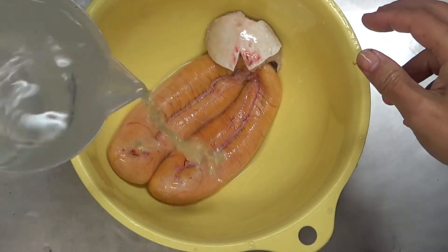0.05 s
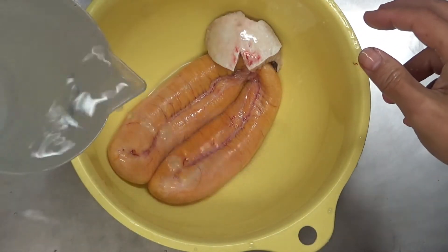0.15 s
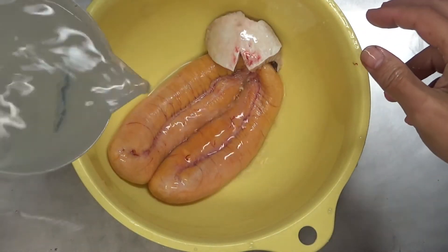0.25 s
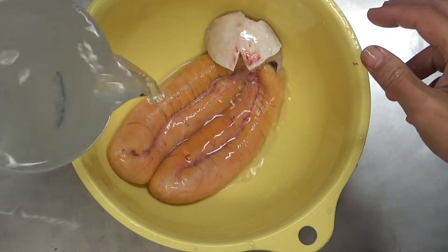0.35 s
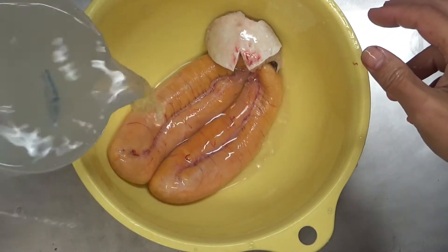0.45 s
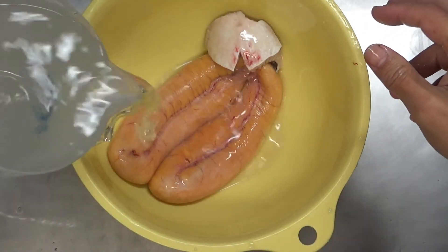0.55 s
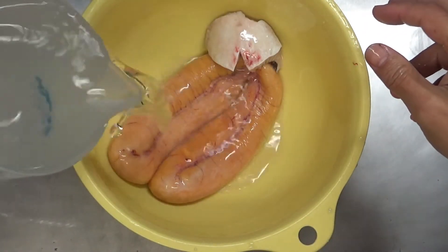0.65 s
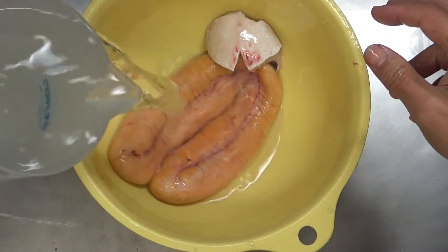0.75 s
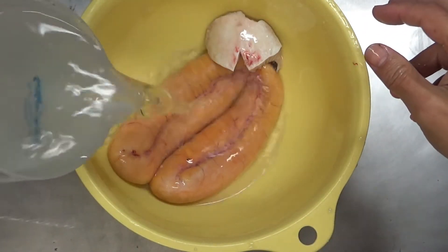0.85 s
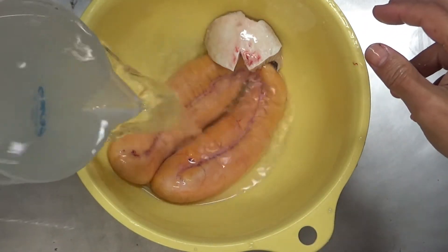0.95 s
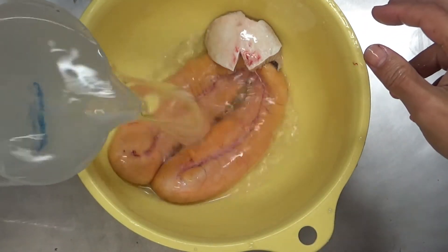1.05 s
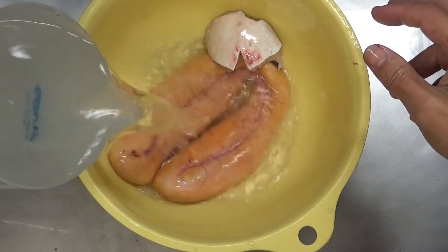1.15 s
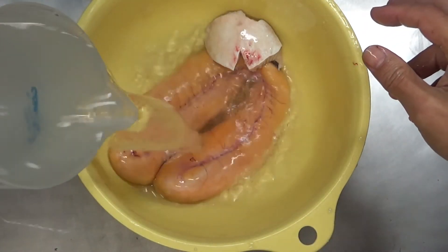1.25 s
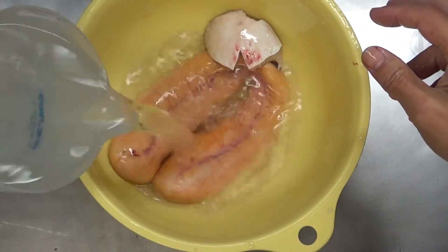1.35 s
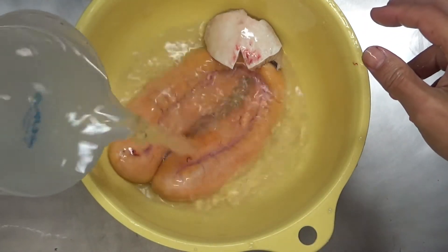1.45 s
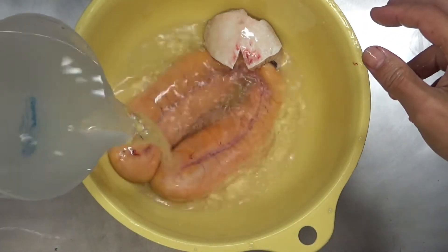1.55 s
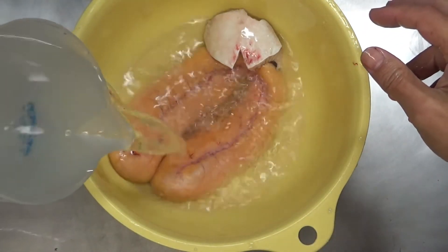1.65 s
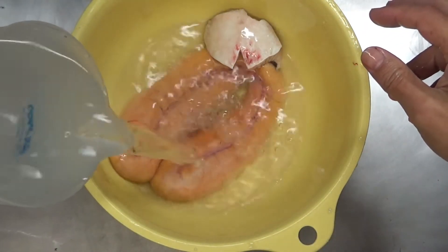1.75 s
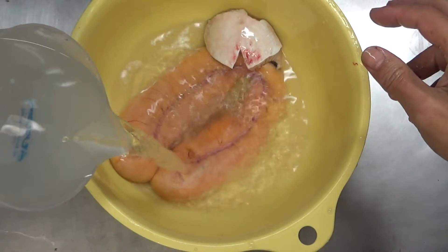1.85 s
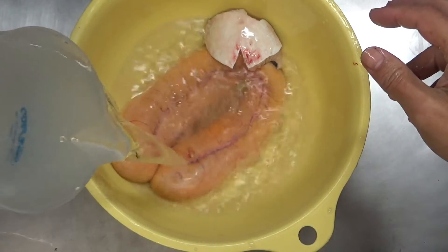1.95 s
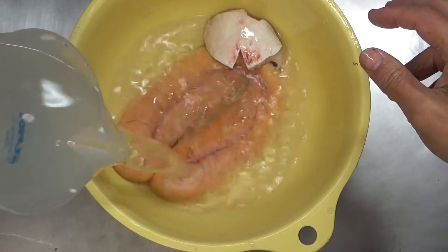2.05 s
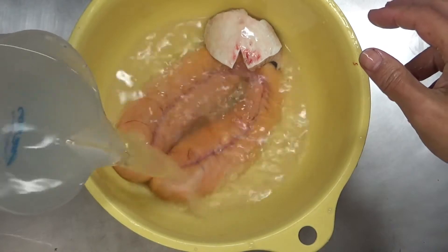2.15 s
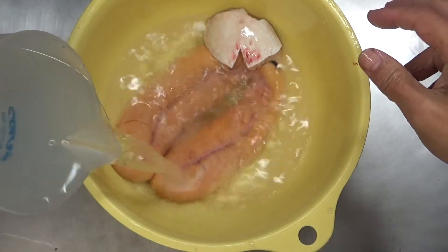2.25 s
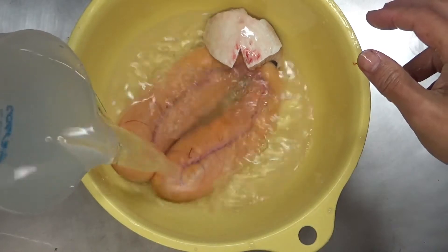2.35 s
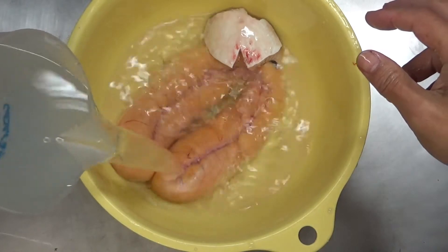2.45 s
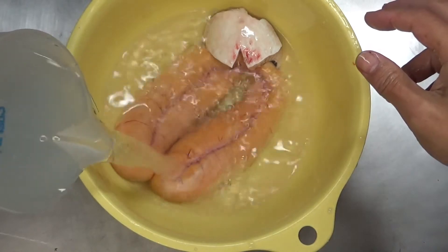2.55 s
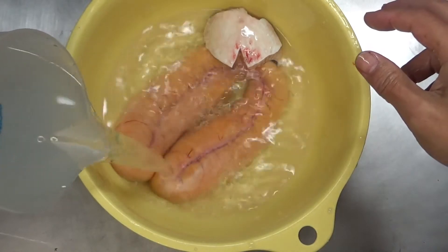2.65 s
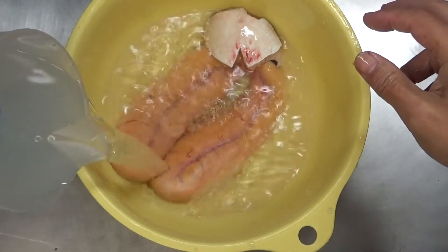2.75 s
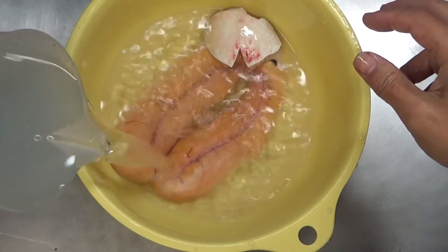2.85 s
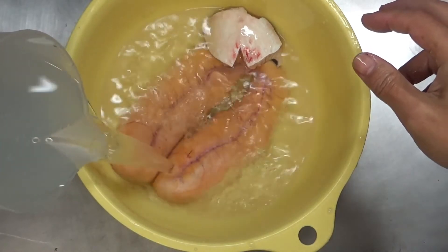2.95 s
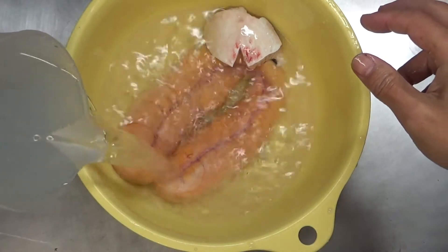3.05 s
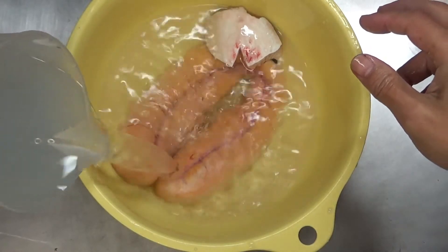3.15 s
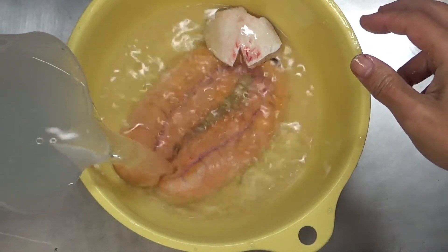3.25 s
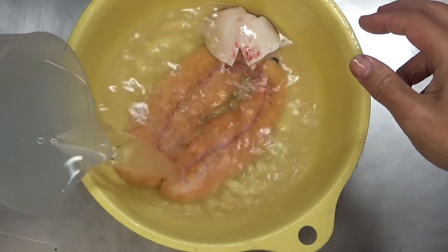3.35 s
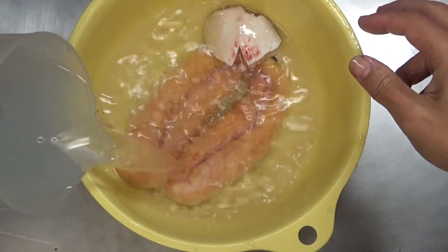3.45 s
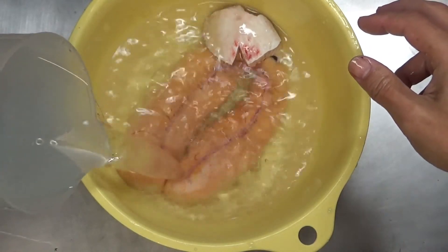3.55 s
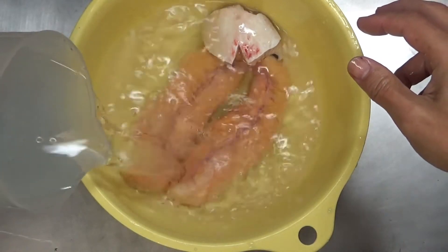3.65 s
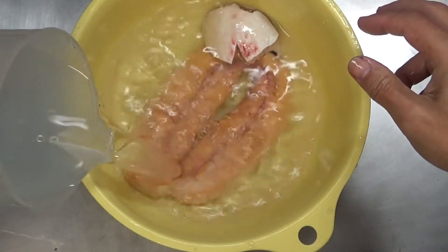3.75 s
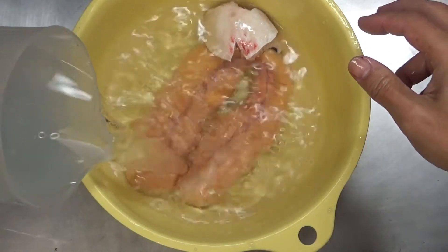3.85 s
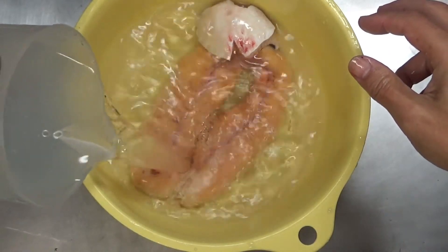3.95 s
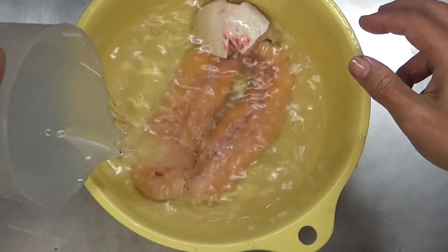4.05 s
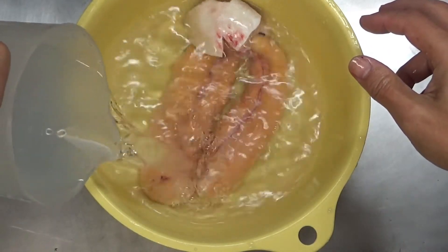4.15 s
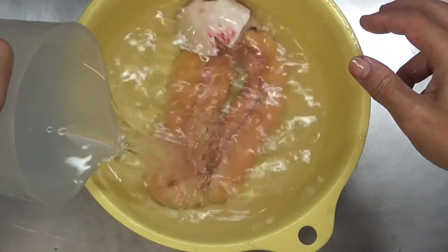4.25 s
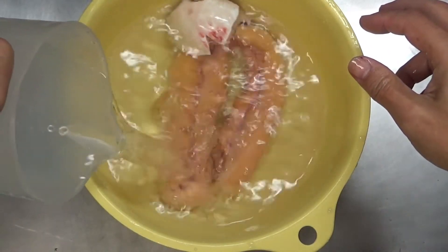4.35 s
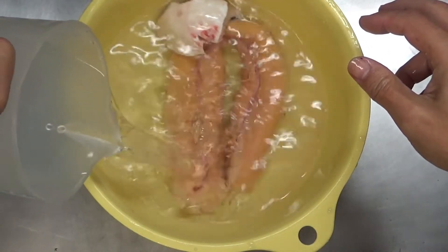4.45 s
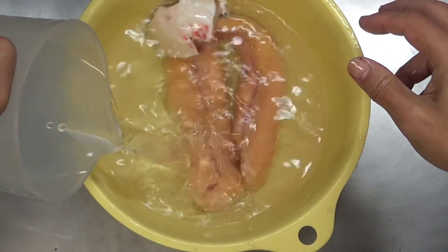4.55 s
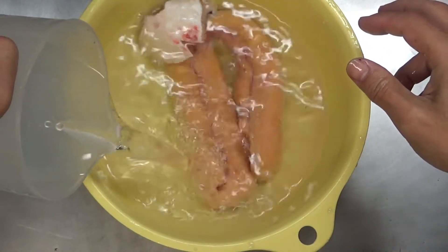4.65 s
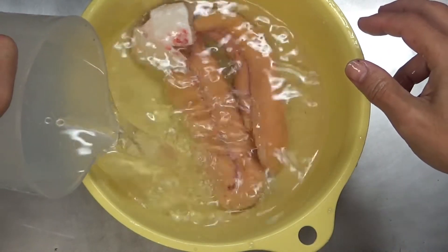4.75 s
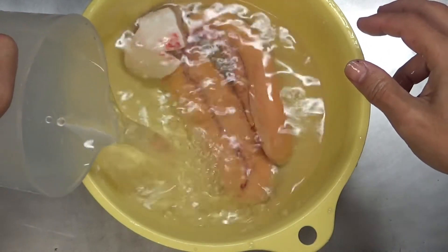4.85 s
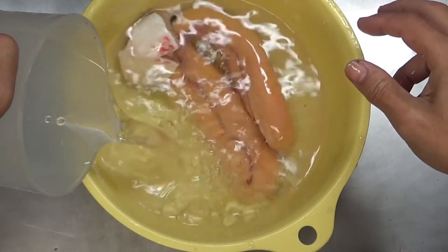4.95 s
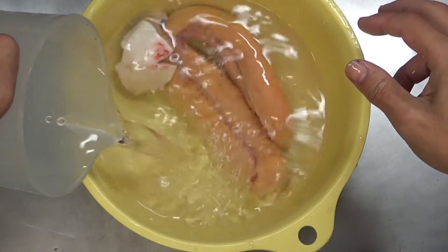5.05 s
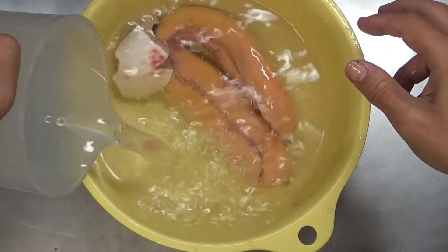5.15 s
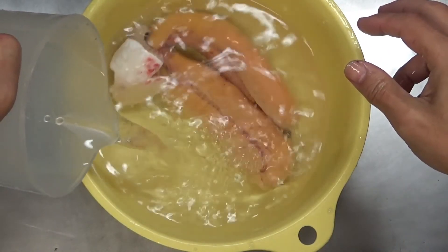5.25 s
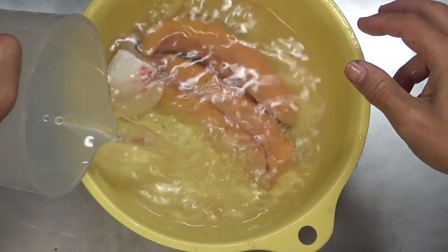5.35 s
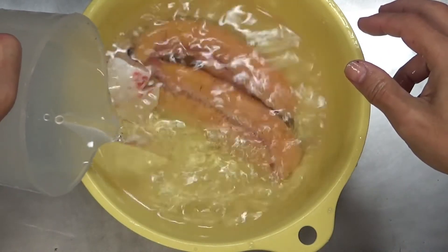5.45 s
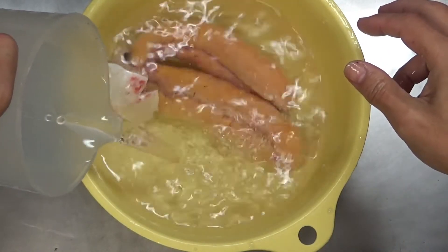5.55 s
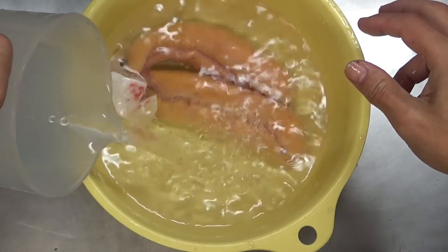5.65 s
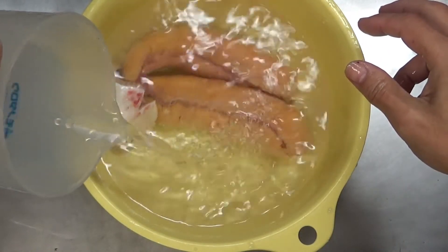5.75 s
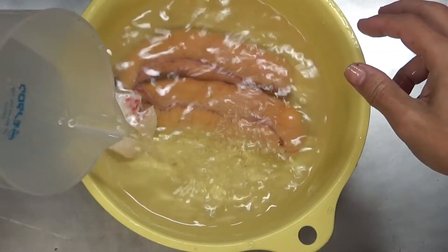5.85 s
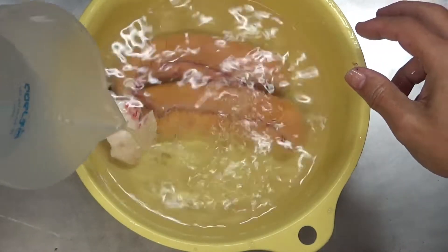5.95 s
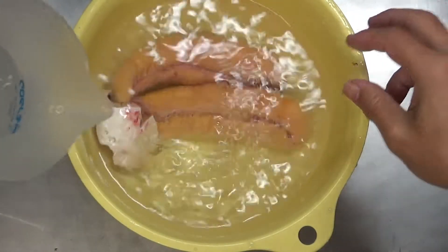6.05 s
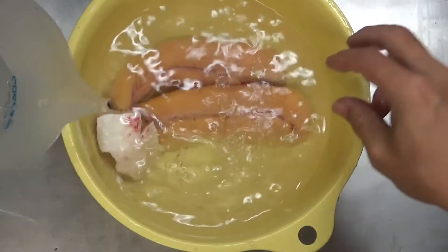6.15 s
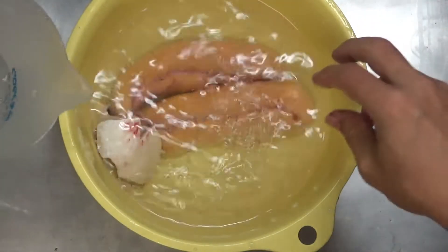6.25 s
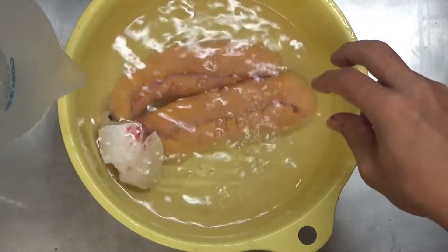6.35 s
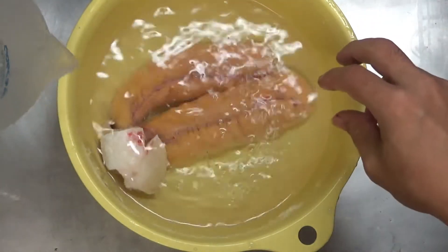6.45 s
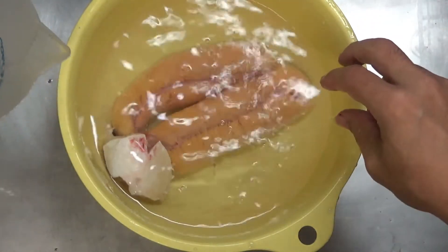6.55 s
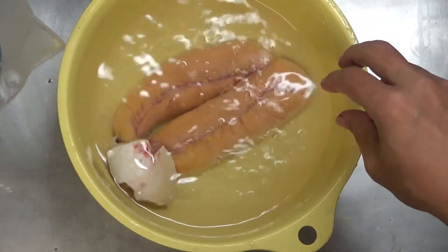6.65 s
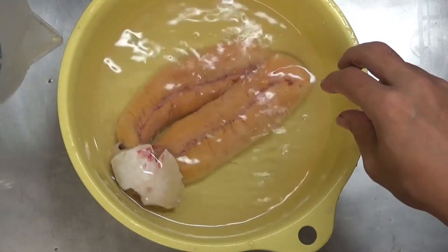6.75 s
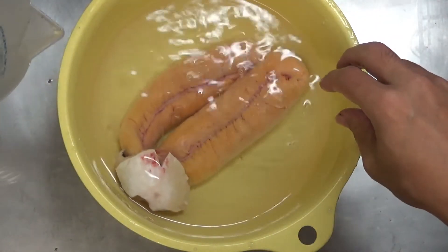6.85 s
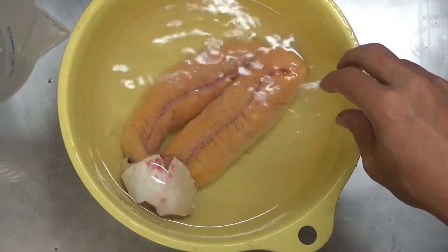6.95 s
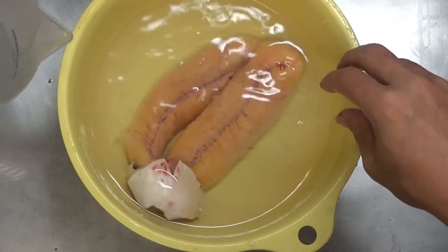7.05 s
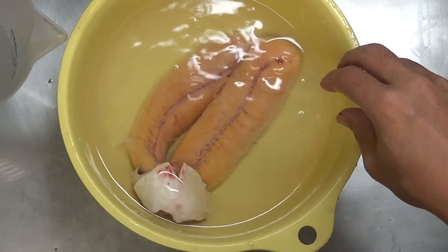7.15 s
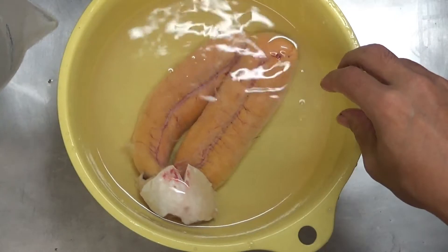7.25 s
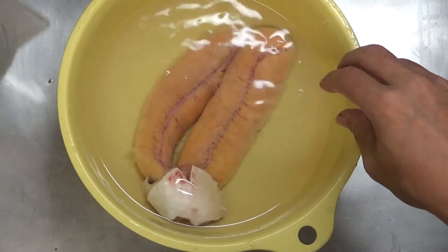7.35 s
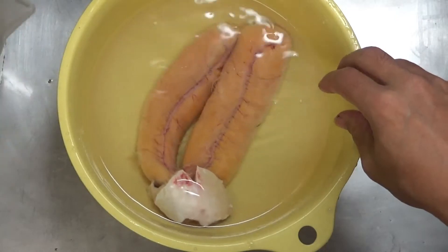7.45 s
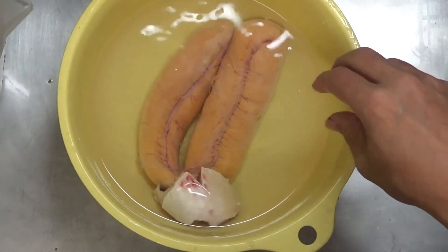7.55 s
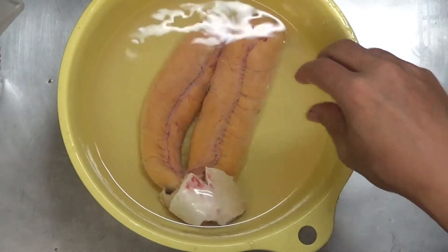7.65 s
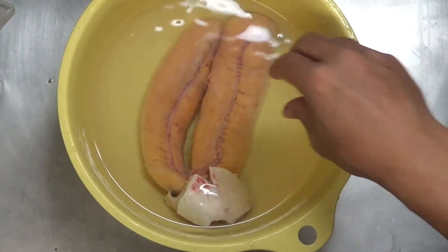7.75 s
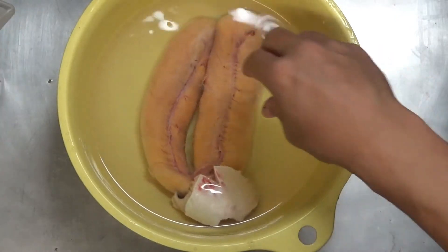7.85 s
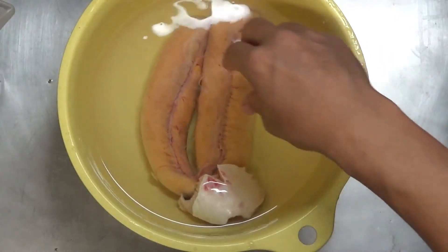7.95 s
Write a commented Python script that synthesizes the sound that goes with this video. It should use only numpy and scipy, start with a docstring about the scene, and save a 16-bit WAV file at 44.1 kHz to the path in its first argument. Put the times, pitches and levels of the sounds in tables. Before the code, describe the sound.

Water splashes, then pours brightly and unevenly from a plastic jug into a plastic bowl, stops, and the jug knocks and squeaks onto a steel counter.

```python
"""Water pours from a plastic jug into a plastic bowl in a quiet kitchen, over room tone, a hum and a far cricket.
A first splash dies down, then the stream runs on and surges: filtered noise makes the spray and splash, clouds of
short ringing tones make the bubbles, and single drops click and gurgle. The stream stops and the foam fades.
The jug is set down on a steel counter: knocks ring as fading tones, the foot squeaks as a wavering tone and
scrapes as noise, and a sleeve rustles while the jug rocks to rest."""
import sys
import numpy as np
from scipy import signal
from scipy.fft import rfft, irfft, next_fast_len
from scipy.io import wavfile
from scipy.ndimage import uniform_filter1d, map_coordinates

SR = 44100
rng = np.random.default_rng(int(sys.argv[2]) if len(sys.argv) > 2 else 0)


def persist_wave(psi):
    """Save psi, clipped to +-1, as 16-bit WAV."""
    counts = np.round(np.clip(psi, -1, 1) * 32767).astype(np.int16)
    wavfile.write(sys.argv[1], SR, np.atleast_2d(counts).T)


N = 353241

# The jug knocking on the counter. Each row: start in seconds, level in dB,
# hollow thud in dB relative to that level, ring of the base in dB relative to that level.
KNOCK_ROWS = [(7.009, -38, -4.5, 10), (7.1086, -39.5, -11, 1), (7.134, -43, -32, 3), (7.2, -47, -29, 10),
              (7.259, -45.5, -36, 7.5), (7.312, -44, -28, 7), (7.352, -45, -34, 3), (7.391, -49, -37, 3),
              (7.4297, -39, -43, -9), (7.5324, -40.5, -43, -14), (7.633, -41.5, -44, -16),
              (7.7066, -51, -8, -6), (7.817, -41.5, -45, -13), (7.9067, -42.5, -50, -13),
              (7.982, -40, -51, -13)]
# How strongly the room sound differs between left and right. Each row: frequency in Hz, relative level in dB.
LEFT_RIGHT_DIFFERENCE = [(60, -35), (250, -13.5), (600, -2.5), (3000, 0), (8000, 4.5), (14000, -37.5)]


def stream():
    """Spray hiss and crackle above, bubbles of three sizes below; each surges partly with the flow, partly alone."""
    # Tone colour of the spray. Each row: frequency in Hz, relative level in dB per Hz.
    spray_colour = [(1470, -29), (2500, -5), (2720, 3.5), (3980, 13), (4210, 12), (6760, -2.5), (9220, 10),
                    (13100, -0.5), (16000, -11)]
    stop_s, foam_hz = 6.07, 5540  # the stream ends; after that the foam sounds mainly above foam_hz
    fizz_db, splash_db, gurgle_db, drum_db = pour()
    surge_db = 1.3 * wobble(45)
    lively = np.clip((fizz_db + 60.5) / 12, .2, 1)  # settling foam mostly hisses and crackles
    thin = np.clip((-21.5 - fizz_db) / 10, .5, 2.5) * lively  # a weak stream spatters unevenly

    spray = hiss(spray_colour, patchy_db=3.5)
    fine = amp(0.74 * wobble(35)) * swarm(5600, 0.615, 6, 9, count=8000, size=300)
    crackle = swarm(8500, .3, 5.5, 3, count=5000, size=64)
    fizz = unit(above(.33 * spray + .8 * lively * fine + .55 * crackle, 2000))

    wash = hiss([(1000, -42.0), (1400, 6.5), (3200, 11.0), (4000, -15)], patchy_db=4.5)
    middling = swarm(2300, .4, 4.5, 9, count=3000, size=700)
    splash = unit(bowl(.55 * wash + .75 * lively * middling))

    churn = hiss([(450, -23.0), (650, -17.5), (1300, -3.0), (1700, -24.5)], patchy_db=0.5)
    large = swarm(957, .35, 3, 9, count=1500, size=900)
    gurgle = unit(bowl(.45 * churn + .7 * large))
    # water drums on the bowl wall
    drum = unit(bowl(hiss([(240, -23), (330, -5), (600, -2.5), (750, -16.5)], patchy_db=2.0)))

    running = np.clip((stop_s - np.arange(N) / SR) * 20 + .5, 0, 1)
    fizz = running * fizz + (1 - running) * above(fizz, foam_hz)
    splash = running * splash
    uneven_fizz = amp(thin * 1.5 * wobble(16)) * fizz
    uneven_splash = amp(splash_db + 2.26 * wobble(24.9)) * above(splash, 430)
    high = amp(fizz_db + surge_db) * (uneven_fizz + uneven_splash)
    uneven_gurgle = amp(2.3 * wobble(18)) * above(gurgle, 280)
    low = amp(gurgle_db + surge_db) * (uneven_gurgle + amp(drum_db) * drum)
    return high + low


def pour():
    """Levels of fizz, splash, gurgle and drumming: the steady pour plus its surges."""
    # The steady pour. Each row: time in seconds, fizz in dB, gurgle in dB, hollow drumming in dB above the gurgle.
    steady = [(0, -49.5, -41.5, -10), (.08, -66, -52, 0), (.3, -59, -71, -2), (.455, -66, -85, 5),
              (.48, -47.5, -83, 14), (.66, -46.5, -65, 12), (.84, -31, -57, 6), (1.02, -37.5, -55, 0),
              (1.28, -32.5, -53, 3.5), (1.68, -47.5, -58, 6), (1.8, -35.5, -45, -16),
              (2.0, -38.5, -60.5, -6), (2.2, -30.5, -48.5, -9), (2.7, -31, -53.5, -6),
              (2.95, -36, -55, -7.5), (3.5, -37, -63, -12), (3.9, -43, -52.5, -10),
              (4.2, -41, -57.5, -12.5), (4.65, -43.5, -64, -9), (4.87, -41.5, -57, -4.5),
              (5.05, -44, -50, -9), (5.25, -47, -60.5, -5.5), (5.7, -51, -65, -8), (6.03, -52, -49.5, -9),
              (6.1, -68.5, -87, -18), (7.0, -67, -91, -13)]
    # Slugs of water landing. Each row: start in seconds, fade time in seconds, fizz in dB, gurgle in dB.
    slugs = [(0.1, 0.048, -27.5, -44), (1.035, 0.46, -32, -44.5), (1.34, 0.32, -28, -50.5),
             (1.389, 0.061, -29, -41), (1.62, 0.058, -56, -45), (1.75, 0.073, -25, -63),
             (2.06, 0.14, -28.5, -44.5), (2.37, 0.14, -60, -44), (2.52, 0.06, -24.5, -51),
             (2.61, 0.078, -50, -42.5), (2.812, 0.039, -22, -38.5), (3.051, 0.084, -29.5, -42.5),
             (3.14, 0.051, -53, -46), (3.29, 0.064, -46, -43), (3.385, 0.058, -28.5, -43),
             (3.515, 0.17, -34, -51), (3.6, 0.036, -27, -36.5), (3.69, 0.22, -30.5, -51),
             (3.78, 0.03, -34, -47), (3.85, 0.037, -28.5, -43), (4.07, 0.076, -62, -43),
             (4.36, 0.053, -31, -42.5), (4.455, 0.1, -60, -41), (4.579, 0.01, -22, -49),
             (4.696, 0.076, -42.5, -45.5), (4.8, 0.036, -26.5, -45), (4.898, 0.058, -37, -35),
             (5.037, 0.023, -28.5, -33), (5.28, 0.084, -40, -41.5), (5.775, 0.46, -43, -63),
             (5.9, 0.015, -29, -42), (5.947, 0.028, -56, -37)]
    rise_s = 0.0077
    fizz_db, gurgle_db, drum_db = curves(steady)
    s, fade_s, slug_fizz_db, slug_gurgle_db = np.transpose(slugs)
    fizz_db = louder(fizz_db, fades(s, slug_fizz_db, rise_s, fade_s))
    gurgle_db = louder(gurgle_db, fades(s, slug_gurgle_db, rise_s, fade_s))
    follows_fizz = 0.46  # the splash level, given relative to the fizz, lies between fizz and gurgle
    splash_db = (1 - follows_fizz) * (gurgle_db - fizz_db)
    return fizz_db, splash_db, gurgle_db, drum_db


def bowl(x):
    """The wall of the bowl rings at its own frequencies and so strengthens them in the water sound."""
    # Each row: frequency in Hz, width of the resonance in Hz, strength in dB.
    wall_modes = [(453, 36, -14.5), (633, 15, -8.5), (1067, 39, -26.5), (1636, 86, -6.5), (1955, 77, -15),
                  (1970, 15, -11.5), (2750, 115, -17.5)]

    def response(f):
        total = 0.15  # a little passes through unchanged
        for k, (centre, width, db) in enumerate(wall_modes):
            resonance = 1j * f * width / (centre * centre - f * f + 1j * f * width)
            total = total + (-1) ** k * amp(db) * resonance
        return total

    return filtered(x, response)


def drops():
    """The loudest single bubbles ring; a small drop clicks as it lands, a large one slaps the bowl."""
    # Small bubbles and drops. Each row: start in seconds, level in dB, starting pitch in Hz,
    # click in dB relative to the level.
    small_drops = [(0.0878, -13.5, 1780, 4), (0.1066, -12, 4270, 6), (0.1163, -14, 2480, 2),
                   (0.269, -34.5, 2830, -3.5), (0.476, -33, 8000, -5), (0.4955, -21.5, 8100, -30),
                   (0.573, -22, 6640, -7), (0.607, -27, 5230, -2), (0.65, -27, 7200, -19),
                   (0.687, -25, 5970, -2), (0.7294, -21.5, 9300, -3), (0.778, -18, 4200, -3),
                   (0.827, -14.5, 8800, -7), (0.874, -16, 8200, -9), (1.041, -12, 2040, -4),
                   (1.049, -22, 7600, -10), (1.091, -14.5, 3800, -11), (1.3352, -16, 3400, 1.5),
                   (1.383, -13, 5770, -1), (1.427, -11, 5350, 0), (1.4713, -12, 7900, -17.5),
                   (1.492, -12.5, 4100, -10.5), (1.5207, -10, 7360, -16.5), (1.6374, -12, 8100, -39),
                   (1.708, -12, 9800, -6), (1.7581, -18.5, 5140, -6), (1.775, -12, 3130, -12),
                   (1.9146, -7, 8260, -12), (1.916, -8, 5020, -20), (1.9465, -14.5, 8500, 1),
                   (2.027, -18, 8000, -4), (2.0594, -20, 5460, 5), (2.0892, -15.5, 4600, -20),
                   (2.13, -9, 9900, -25), (2.1626, -15, 10100, -6), (2.1683, -12.5, 7900, 2.5),
                   (2.181, -19.5, 6300, -1), (2.209, -12.5, 8600, -12), (2.221, -11, 9000, 0),
                   (2.265, -8, 2720, -2), (2.283, -18.5, 4800, -10), (2.319, -12.5, 8900, -2.5),
                   (2.4342, -14.5, 8300, -9), (2.5218, -7.5, 2880, -6), (2.5805, -12.5, 9000, -3.5),
                   (2.696, -15, 5540, -10), (3.046, -12, 3570, 0), (3.1772, -12, 8540, -17),
                   (3.1918, -15.5, 8900, -10), (3.234, -15.5, 5400, 0.5), (3.3273, -7.5, 4160, -11.5),
                   (3.373, -15, 9300, -4), (3.5157, -17.5, 2020, 2), (3.548, -18.5, 10400, -24),
                   (3.6239, -11, 5340, 1.5), (3.695, -12, 3530, 2.5), (3.72, -18, 6900, -11),
                   (3.784, -4, 8600, -11), (3.792, -10.5, 8500, -8.5), (3.837, -14.5, 5200, -17),
                   (3.852, -15, 1560, 2), (4.006, -17.5, 8260, -11), (4.294, -16.5, 5450, -5),
                   (4.363, -13, 2510, -30), (4.3835, -19, 3800, 6), (4.705, -17.5, 4520, 3),
                   (4.8273, -12, 5300, -10), (4.922, -10.5, 4310, -37), (4.956, -21, 11300, -6.5),
                   (5.014, -18.5, 8850, -3.5), (5.163, -20.5, 8400, -3), (5.29, -14.5, 3750, -8.5),
                   (5.4275, -19.5, 5070, -20), (5.776, -28, 7160, 4.5), (5.873, -25.5, 5000, -2),
                   (5.926, -39, 5050, 1.5), (5.9483, -20, 8700, -1), (6.296, -46, 3830, -6),
                   (5.999, -14, 8300, -2.5)]
    # Large bubbles. Each row: start in seconds, level in dB, starting pitch in Hz.
    large_bubbles = [(0.662, -41, 2320), (0.688, -34.5, 1545), (0.895, -28, 2020), (1.005, -30, 1910),
                     (1.039, -14, 1936), (1.339, -24, 1854), (1.396, -21.5, 1940), (1.488, -22, 1940),
                     (1.598, -25.5, 1900), (2.064, -22.5, 1850), (2.103, -26, 1910), (2.205, -28, 1706),
                     (2.312, -25, 1686), (2.521, -18, 1906), (2.938, -24, 1033), (3.11, -38, 790),
                     (3.157, -31.5, 1130), (3.273, -38, 850), (3.4, -30.5, 1070), (3.623, -29, 1520),
                     (4.088, -29, 1033), (4.337, -33.5, 1250), (4.376, -37, 1330), (4.475, -33, 1140),
                     (4.528, -30, 1610), (4.69, -33.5, 1550), (4.705, -33, 1117), (4.868, -32, 1690),
                     (4.9, -32, 603), (4.902, -36, 990), (4.908, -37, 810), (4.922, -30, 505),
                     (4.921, -34, 1670), (4.937, -33, 910), (4.966, -37, 810), (5.045, -31, 967),
                     (5.043, -37.5, 554), (5.788, -35, 1410), (5.951, -34.5, 1310), (6.02, -32.5, 1840)]
    snap_db, snap_s = 3.5, 0.00034  # sharp front of a landing drop: level over its click, fade time

    s, db, hz, click_db = np.transpose(small_drops)
    pops = bubbles(s, amp(db), hz, 10.9, 0.1, size=500)
    clicks = bursts(s, amp(db + click_db), 0.0045, size=500)
    pops += filtered(clicks, lambda f: 1 / (1 + 1j * f / 9000) ** 2)  # softens the treble
    pops += bursts(s, amp(db + click_db + snap_db), snap_s, size=200)

    s, db, hz = np.transpose(large_bubbles)
    slaps = bowl(bursts(s, amp(db + 6.0), 0.005, size=2000))
    glugs = bubbles(s, amp(db), hz, 10.8, 0.057, size=2000) + slaps
    return above(pops, 2170) + above(glugs, 230)


def bubbles(s, gain, hz, cycles, rise, size):
    """Each bubble is a fading sine whose pitch climbs early in its life, as it nears the surface."""
    turns = np.arange(size) / SR * hz[:, None]
    life = turns / cycles
    climb = 1 + rise * np.minimum(life, 2) / 2
    wave = np.sin(2 * np.pi * turns * climb) * np.exp(-life) * (1 - np.exp(-2 * turns))
    wave *= gain[:, None] * np.cos(np.linspace(0, np.pi / 2, size))  # ends in silence
    at = (np.round(s * SR).astype(int)[:, None] + np.arange(size)).ravel()
    return np.bincount(at, wave.ravel(), N + SR)[:N]


def swarm(centre_hz, octaves, spread_db, cycles, count, size):
    """A random cloud of bubbles around one pitch, many quiet and a few loud, rms 1."""
    draw = rng.random((count, 2))
    hz = np.clip(centre_hz * 2 ** (octaves * rng.standard_normal(count)), 200, 15000)
    rank = np.log(draw[:, 1] + .03)
    climb = .14 * rng.random((count, 1))
    return unit(bubbles(draw[:, 0] * N / SR, amp(-spread_db * rank), hz, cycles, climb, size))


def jug():
    """Knocks ring base and body; the wet foot squeaks and scrapes while it slides, a sleeve rustles."""
    # The hollow body, then the stiff base. Each row: frequency in Hz, relative level in dB,
    # time to fade by 60 dB in seconds.
    body_modes = [(142, 9.5, 0.038), (215, 13.5, 0.025), (353, -0.5, 0.039), (488, 8.5, 0.033)]
    foot_modes = [(1114, -15, 0.036), (1440, -5, 0.028), (1824, 4.5, 0.027), (2060, 1.5, 0.022),
                  (2550, -11, 0.03), (3380, -13, 0.026)]
    # Tone colour of scrape and rustle. Each row: frequency in Hz, relative level in dB per Hz.
    scrape_colour = [(120, -34), (200, -8), (334, -4), (573, 3), (1330, -0.5), (4000, -12.5), (6000, -30),
                     (8800, -120)]
    rustle_colour = [(1760, -14), (3000, -6), (3900, -9), (6550, -8), (8930, -6.5), (15000, -29)]

    out, t = np.zeros(N + SR), np.arange(SR // 4) / SR

    def ring(modes):
        total = 0
        for hz, db, t60 in modes:
            varied_db = db + rng.standard_normal()  # each knock is a little different
            total = total + amp(varied_db - 60 * t / t60) * np.sin(2 * np.pi * hz * t)
        return total

    for s, db, thud_db, ring_db in KNOCK_ROWS:
        blow = amp(db + ring_db) * ring(foot_modes) + amp(db + thud_db + 8.0) * ring(body_modes)
        out[round(s * SR):][:len(t)] += blow * (1 - np.exp(-t / 0.0025))

    s, db = np.transpose(KNOCK_ROWS)[:2]
    taps = bursts(s, amp(db + 4.5), 0.0042, size=2000)
    taps = filtered(taps, lambda f: 1j * f * 1400 / (1500 ** 2 - f * f + 1j * f * 1400))  # favours 1500 Hz

    t = np.arange(N) / SR
    scrape, squeal, rustle = slide(t)
    tone = np.sin(2 * np.pi * 1440 * t + 0.2 * wobble(40))
    overtone = amp(-21) * np.sin(2 * np.pi * 3340 * t + wobble(60))
    squeak = np.sqrt(2) * amp(.8 * wobble(90)) * (tone + overtone)
    rub = squeal * squeak
    rub = rub + scrape * hiss(scrape_colour, patchy_db=3.5)
    rub = rub + rustle * hiss(rustle_colour, patchy_db=5.5)
    return above(out[:N] + taps + rub, 71)


def slide(t):
    """Gains of scrape, squeak and rustle: rubbing is loud only while surfaces move against each other."""
    # The foot grips once in each rock. Each row: loudest moment in seconds, level in dB, half width in seconds.
    squeaks = [(7.1, -55, .015), (7.165, -46, 0.022), (7.224, -45, 0.024), (7.282, -44, 0.028),
               (7.33, -51, 0.027), (7.36, -55, .02), (7.405, -56, 0.036)]
    # The sleeve. Each row: loudest moment in seconds, level in dB, half width in seconds.
    rustles = [(7.1, -54, 0.17), (7.25, -63, 0.23), (7.7, -56.5, 0.075), (8.02, -51.5, 0.11)]
    # Long scrapes. Each row: start in seconds, end in seconds, level in dB, change by the end in dB.
    slides = [(7.009, 7.466, -48, -14.5), (7.635, 7.77, -67, 6.5)]
    edge_s = 0.012  # each long scrape fades in and out over this time
    skid_db, skid_s = -18.5, 0.062  # scrape after each knock: level against the knock, fade time

    drag = 0
    for start, end, db, change_db in slides:
        edge = np.clip(np.minimum(t - start, end - t) / edge_s, 0, 1)
        drag = drag + edge * amp(db + change_db * np.clip((t - start) / (end - start), 0, 1))
    s, db = np.transpose(KNOCK_ROWS)[:2]
    skids = amp(fades(s, db + skid_db, 0.0049, skid_s))

    def bump(peak_s, level_db, width):
        return amp(level_db) * np.clip(1 - ((t - peak_s) / width) ** 2, 0, 1) ** 2

    squeal = sum(bump(*row) for row in squeaks)
    rustle = sum(bump(*row) for row in rustles)
    return drag + skids, squeal, rustle


def room(x):
    """The kitchen's echo, different at each ear and always shifting; each frequency dies at its own speed."""
    # Each row: frequency in Hz, time to fade by 60 dB in seconds.
    wall_fade = [(300, 0.22), (2000, 0.15), (10000, 0.025)]
    hz, t, z = signal.stft(rng.standard_normal((4, 2, SR // 4)), SR, nperseg=256)
    fading = z * amp(-60 * t / along(wall_fade, hz)[:, None])
    tails = signal.istft(fading, SR, nperseg=256)[1]
    turn = np.pi * np.arange(N) / SR  # the four echo tails take turns, one round a second
    echo = 0
    for k, tail in enumerate(tails):
        part = np.pad(x * np.cos(turn + k * np.pi / 4) ** 4, (150, 0))[None]  # echo starts 150 samples late
        echo = echo + signal.fftconvolve(part, tail / np.linalg.norm(tail[0]), axes=1)[:, :N]
    return echo


def background():
    """Noise for room tone and a low rumble that soon drops away, plus a wavering hum and a far cricket's tone."""
    # Tone colour of the room tone, then of the rumble. Each row: frequency in Hz, relative level in dB per Hz.
    air_colour = [(24, -63), (40, -22), (158, -8), (235, 1), (294, -2), (449, -3), (859, -5.5), (1770, -5),
                  (7340, -26), (15500, -9)]
    deep_colour = [(11, -15), (18, 6), (29, 0), (43, -5), (50, 8), (58, -2.5), (76, -4.5), (160, -4.5),
                   (210, -12.5), (350, -120)]
    # Loudness of the rumble. Each row: time in seconds, level in dB.
    rumble_level = [(0, -64), (1.39, -63), (1.44, -76.5), (5.9, -87), (6.2, -101), (8.01, -97)]
    mid = hiss(air_colour, patchy_db=1.6)
    side = filtered(hiss(air_colour, patchy_db=5.5), lambda hz: amp(along(LEFT_RIGHT_DIFFERENCE, hz) + 4.0))
    air = amp(-62.5) * np.array([mid + side, mid - side])
    t = np.arange(N) / SR
    hum = amp(-82.5) * np.sin(2 * np.pi * 98 * t + 2.2 * wobble(11))
    pulses = np.sin(np.pi * 29 * t) ** 4  # 29 chirps a second
    chirr = amp(-76 + 2 * wobble(4)) * pulses * np.sin(2 * np.pi * 4050 * t + wobble(84))
    deep = unit(filtered(rng.standard_normal(N), lambda hz: amp(along(deep_colour, hz))))
    rumble = amp(curves(rumble_level)[0]) * deep
    return air + rumble + chirr + hum


def amp(db):
    """Turns decibels into a plain gain."""
    return 10 ** (np.asarray(db) / 20)


def unit(x):
    """Scales a sound to rms 1."""
    return x / np.sqrt(np.mean(x ** 2) + 1e-20)


def along(points, hz):
    """Reads a curve of (Hz, value) points on a log frequency axis."""
    f, v = np.transpose(points)
    return np.interp(np.log(hz + 1), np.log(f + 1), v)


def curves(rows):
    """One dB value per sample for each column after the time; -120 dB outside the table."""
    s, *cols = np.transpose(rows)
    return [np.interp(np.arange(N) / SR, s, c, left=-120, right=-120) for c in cols]


def wobble(rate):
    """A smooth random curve with rate random points a second."""
    knots = rng.standard_normal(int(N * rate / SR) + 4)
    return map_coordinates(knots, [np.arange(N) * rate / SR])


def filtered(x, response):
    """Multiplies the spectrum of x by a response that depends on frequency."""
    m = next_fast_len(N + SR // 2)
    return irfft(rfft(x, m) * response(np.fft.rfftfreq(m, 1 / SR)), m)[..., :N]


def above(x, hz):
    """Small sources radiate little bass: a gentle cut below hz."""
    return filtered(x, lambda f: (1j * f / hz / (1 + 1j * f / hz)) ** 2)


def hiss(spectrum, patchy_db):
    """Coloured noise of rms 1 with patches of random gain in time and pitch."""
    z = signal.stft(rng.standard_normal(N), nperseg=256)[2]
    field = uniform_filter1d(uniform_filter1d(rng.standard_normal(z.shape), 5, 0), 3, 1)
    rough = signal.istft(z * amp(patchy_db * unit(field)), nperseg=256)[1][:N]
    return unit(filtered(rough, lambda hz: amp(along(spectrum, hz))))


def bursts(s, gain, decay, size):
    """Short puffs of noise with a quick rise; decay is in seconds."""
    t = np.arange(size) / SR / decay
    puff = rng.standard_normal((len(s), size)) * np.exp(-t) * (1 - np.exp(-6 * t)) * gain[:, None]
    at = np.round(s * SR).astype(int)[:, None] + np.arange(size)
    return np.bincount(at.ravel(), puff.ravel(), N + size)[:N]


def fades(s, db, rise, fade):
    """Summed level in dB of swells that rise quickly and die away."""
    t = np.maximum(np.arange(N) / SR - s[:, None], 0)
    shape = amp(db)[:, None] * (1 - np.exp(-t / rise)) * np.exp(-t / np.reshape(fade, (-1, 1)))
    return 10 * np.log10(np.sum(shape ** 2, axis=0) + 1e-14)


def louder(a_db, b_db):
    """Level in dB of two unrelated sounds together: their powers add."""
    return 10 * np.log10(amp(2 * a_db) + amp(2 * b_db))


def scene():
    """Water and jug heard directly, their echo in the kitchen, and the background, in stereo."""
    near = stream() + drops() + jug()
    echo = room(near)
    both = echo.mean(0)  # close microphone ports hear much the same room
    apart = filtered((echo[0] - echo[1]) / 2, lambda hz: amp(along(LEFT_RIGHT_DIFFERENCE, hz)))
    direct = near * amp([[.2], [-.2]])  # first channel slightly louder
    return direct + amp(-7.5) * both + amp(-15.0) * np.array([apart, -apart]) + background()


def record(dry):
    """The microphone adds hiss and fades in the treble; nothing is kept above the band limit."""
    # Treble loss of the microphone. Each row: frequency in Hz, gain in dB.
    mic_treble = [(9500, -1), (12000, -5.5), (16000, -13)]
    mic_hiss = amp(-63.0) * above(rng.standard_normal(N), 1100)
    heard = filtered(dry + mic_hiss, lambda hz: amp(along(mic_treble, hz)))
    return filtered(heard, lambda hz: hz < 15900)


dry = scene()
out = record(dry)
persist_wave(out)
```